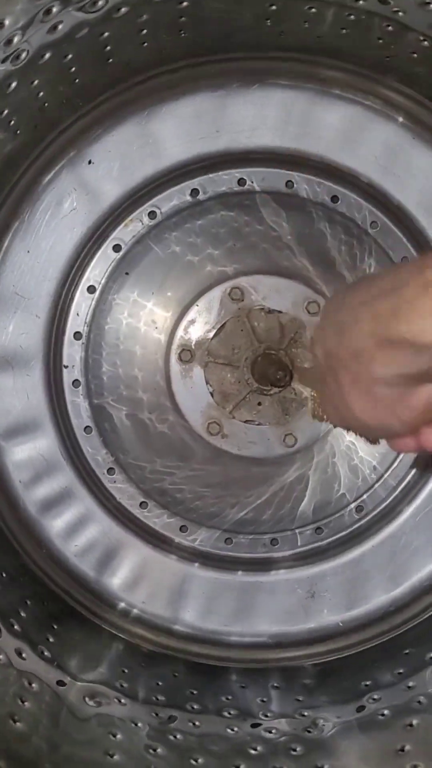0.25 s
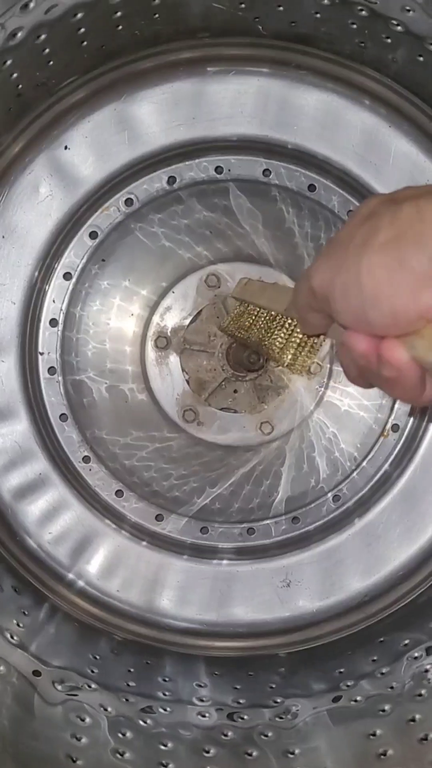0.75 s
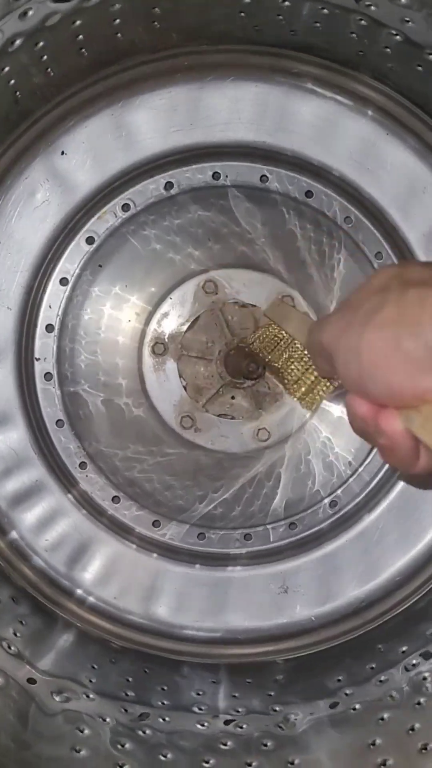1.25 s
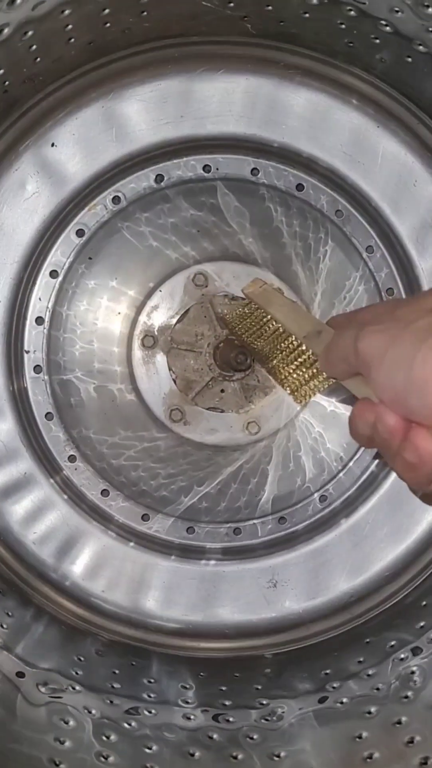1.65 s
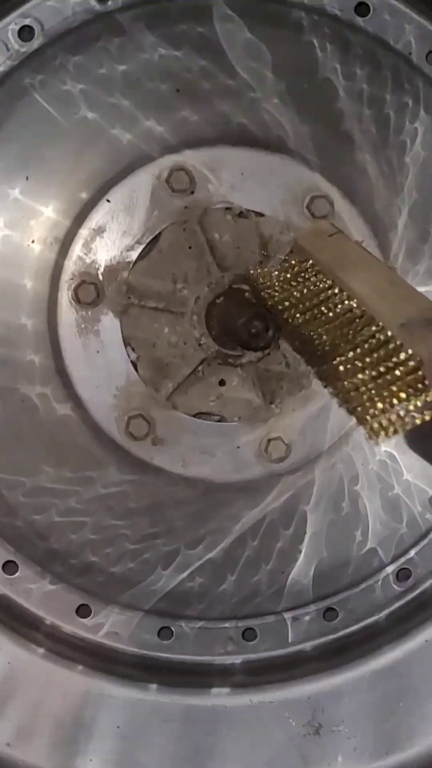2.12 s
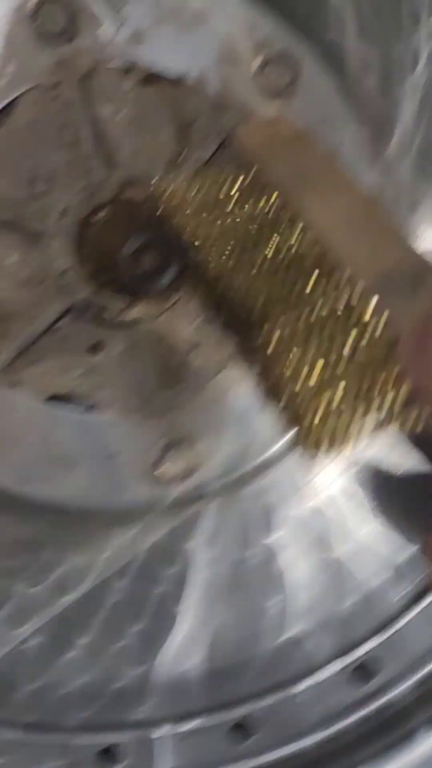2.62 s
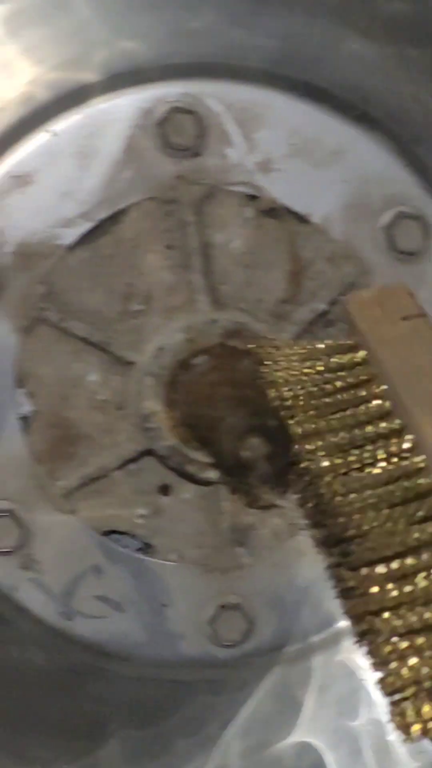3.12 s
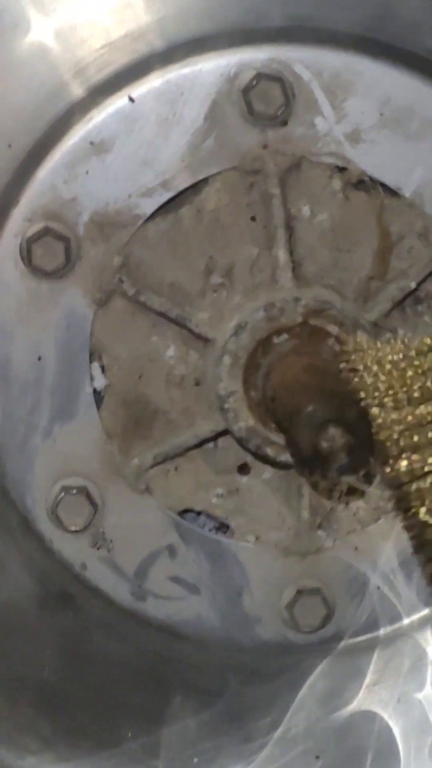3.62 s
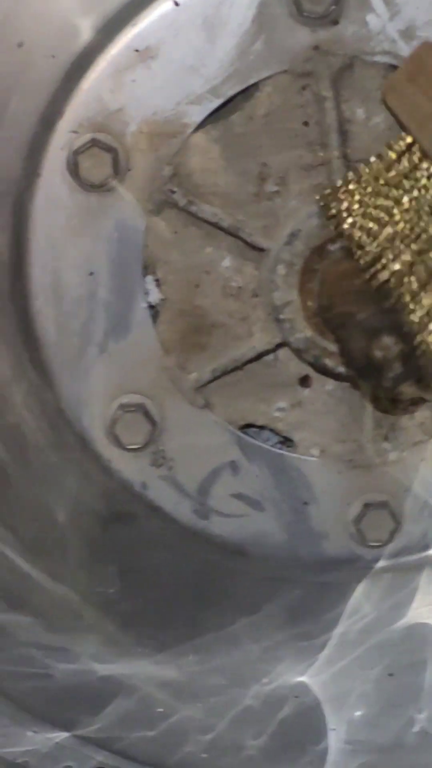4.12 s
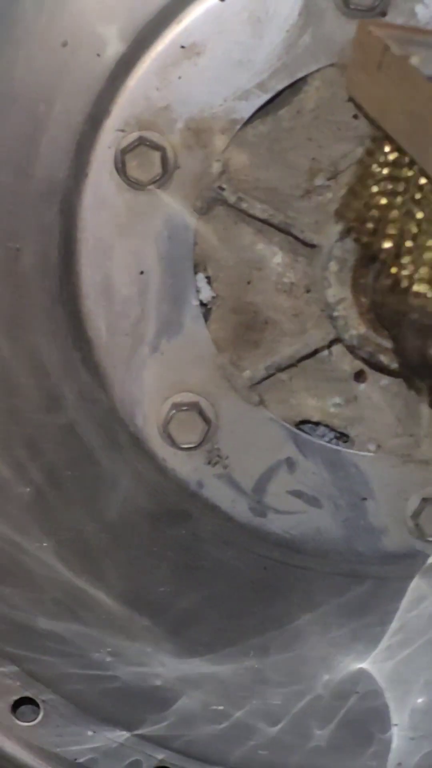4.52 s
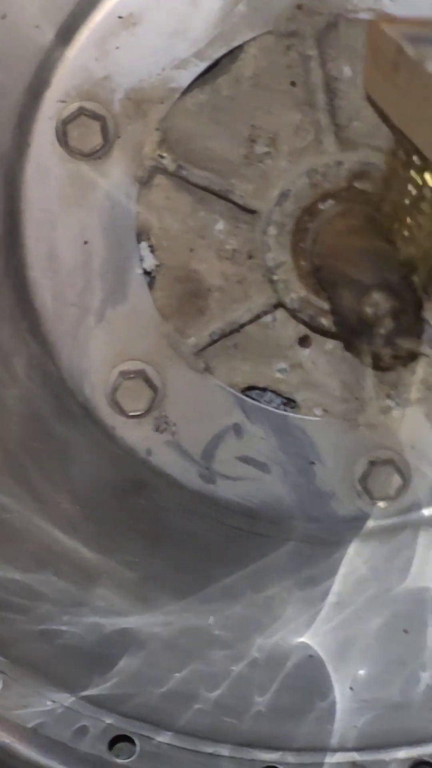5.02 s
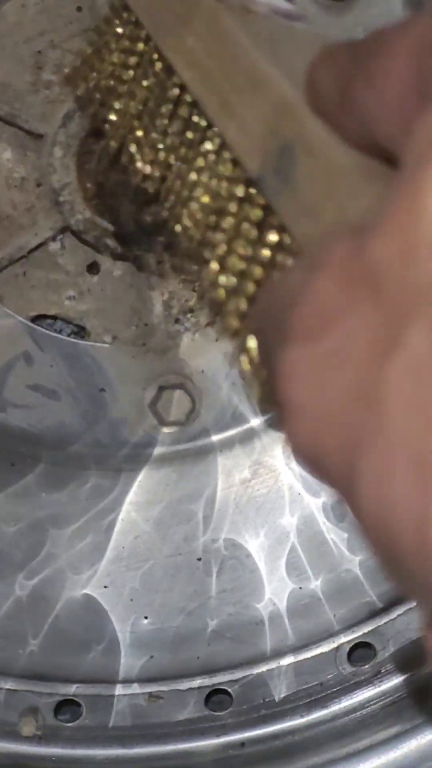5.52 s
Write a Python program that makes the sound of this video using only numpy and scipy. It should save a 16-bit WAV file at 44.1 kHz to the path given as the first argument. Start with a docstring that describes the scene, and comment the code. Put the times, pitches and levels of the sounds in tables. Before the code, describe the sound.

A wire brush knocks and scrapes inside a steel tub, then scrubs the grimy metal hub in quick, even, raspy strokes with hollow booming.

```python
"""Faint scraping and hard knocks open the scene, then a brass wire brush scrubs the grimy hub at the
bottom of a steel washing tub, about six strokes a second. Dense random bristle slips hiss, excite the hub's
resonances as a scrape and make the tub boom. Landings, shoves, knocks and clear pings are decaying noise
or modes. Echoes in the tub reach two microphone ports; a quiet room hums and a low rumble comes and goes."""
import sys
import numpy as np
from scipy import signal
from scipy.fft import rfft, irfft, next_fast_len
from scipy.io import wavfile
from scipy.ndimage import uniform_filter1d, map_coordinates

SR = 44100
rng = np.random.default_rng(int(sys.argv[2]) if len(sys.argv) > 2 else 0)


def wrap_up_sound(samples):
    """Save the sound to the file named by the first command line argument, as 16-bit audio."""
    columns = np.atleast_2d(samples).T
    # keep every value between -1 and 1, then stretch to whole-number steps
    tamed = np.clip(columns, -1, 1)
    steps = np.round(tamed * 32767).astype(np.int16)
    wavfile.write(sys.argv[1], SR, steps)


N = 253575

# Modes of the tub's air and wall. Each row: frequency in Hz, width in Hz, relative level in dB.
TUB_MODES = [(127.7, 31, -7.5), (274, 34, -1.5), (290.6, 24, 6.5), (328, 40.2, 7), (472.2, 28.3, 3.5),
             (594, 65, -15.5), (780, 74, -17)]
# Stereo width of the sound field. Each row: frequency in Hz, side minus mid in dB.
SIDE_SPECTRUM = [(80, -5.5), (180, -26), (350, -10.5), (700, -3), (2000, -3), (15000, 1)]
# The tub's upper modes ring more or less as the brush moves. Each row: time in seconds, gain in dB.
UPPER_GAIN = [(2.4, 2), (3.6, 3.5), (4.6, 0)]


def amp(db):
    """The decibel law: 20 dB is a factor of ten in amplitude."""
    return 10 ** (np.asarray(db) / 20)


def unit(x):
    """Normalise to an rms of one."""
    return x / np.sqrt(np.mean(x ** 2) + 1e-20)


def along(points, hz):
    """Interpolate (Hz, value) points on a log-frequency axis, since hearing judges pitch by ratio."""
    f, v = np.transpose(points)
    return np.interp(np.log(hz + 1), np.log(f + 1), v)


def curves(rows):
    """Interpolate linearly in time: one value per sample for each column after the time."""
    s, *columns = np.transpose(rows)
    return [np.interp(np.arange(N) / SR, s, column) for column in columns]


def wobble(rate):
    """Slow random modulation: a smooth curve through `rate` random knots a second."""
    knots = rng.standard_normal(int(N * rate / SR) + 4)
    return map_coordinates(knots, [np.arange(N) * rate / SR])


def filtered(x, response):
    """Linear filtering: the spectrum times a complex response of frequency."""
    m = next_fast_len(N + SR // 2)
    return irfft(rfft(x, m) * response(np.fft.rfftfreq(m, 1 / SR)), m)[..., :N]


def resonant(modes):
    """Modal superposition: damped resonators (Hz, width in Hz, dB) add with alternating sign."""
    def response(f):
        total = 0
        for k, (centre, width, db) in enumerate(modes):
            damping = 1j * f * width
            total = total + (-1) ** k * amp(db) * damping / (centre * centre - f * f + damping)
        return total
    return response


def coloured(x, spectrum):
    """Spectral shaping: a smooth (Hz, dB) curve weights the frequencies, rms one."""
    return unit(filtered(x, lambda hz: amp(along(spectrum, hz))))


def bursts(times, levels_db, t60s, rise):
    """Exponential decay: an envelope jumps at each time and falls 60 dB in each t60."""
    env, t = np.zeros(N + SR), np.arange(SR // 2) / SR
    for s, db, t60 in zip(times, levels_db, t60s):
        decay = amp(db - 60 * t / max(t60, .005))
        env[round(s * SR):][:len(t)] += decay * (1 - np.exp(-t / rise))
    return env[:N]


def strokes():
    """Speed sets friction loudness: each stroke is a bell in time, giving gains of hiss, scrape and boom."""
    # Brush strokes. Each row: fastest moment in seconds, speed-up in seconds, slow-down in seconds,
    # hiss level in dB, hub scrape in dB over hiss, tub boom in dB over hiss.
    stroke_rows = [(0.06, 0.45, 0.16, -39.5, 2, 9), (0.521, 0.092, 0.045, -49, 0.5, 5.5),
                   (0.762, 0.051, 0.034, -49.5, -2, 11), (0.884, 0.051, 0.065, -39.5, -6, -1),
                   (1.26, 0.02, 0.03, -41, -7, 9), (1.402, 0.1, 0.097, -50.5, 0, 8),
                   (1.579, 0.044, 0.038, -41, 1.5, 3), (1.72, 0.085, 0.069, -46, 6.5, 9),
                   (1.891, 0.052, 0.032, -36, 5, 12), (2.036, 0.074, 0.059, -30, 2, 8.5),
                   (2.211, 0.056, 0.028, -32, 4.5, 9.5), (2.332, 0.059, 0.08, -32.5, 3.5, 8),
                   (2.513, 0.06, 0.044, -31.5, 3.5, 8), (2.666, 0.075, 0.066, -34.5, 2.5, 8.5),
                   (2.831, 0.051, 0.042, -30, 2.5, 5.5), (2.989, 0.086, 0.063, -33, 4, 4),
                   (3.174, 0.067, 0.064, -34.5, 4, 7), (3.32, 0.067, 0.05, -32, 4, 6.5),
                   (3.483, 0.062, 0.062, -30, 2.5, 5.5), (3.64, 0.06, 0.051, -32.5, 3.5, 5.5),
                   (3.799, 0.057, 0.062, -30.5, 2.5, 3.5), (3.997, 0.079, 0.039, -33, 5, 6),
                   (4.134, 0.068, 0.063, -30, 3, 0), (4.305, 0.064, 0.055, -30.5, 3, 4.5),
                   (4.477, 0.056, 0.093, -29.5, 3.5, 2), (4.651, 0.049, 0.049, -31.5, 4, 6),
                   (4.805, 0.064, 0.043, -27.5, 1.5, 1), (4.975, 0.23, 0.051, -35, -0.5, 2.5),
                   (5.134, 0.08, 0.04, -35.5, -0.5, 5), (5.235, 0.041, 0.069, -37, -3.5, 5.5),
                   (5.479, 0.065, 0.056, -36, 3.5, 4), (5.629, 0.055, 0.078, -42, 4.5, 8.5),
                   (5.748, 0.019, 0.013, -40, 6.5, 14)]
    drop_db = 10  # hiss lost one speed-up before or one slow-down after the fastest moment
    scrape_follows, boom_follows = 0.89, 0.85  # shares of that fade
    s, rise, fall, db, scrape_db, boom_db = np.transpose(stroke_rows)[..., None]
    t = np.arange(0, N / SR + 1, 1 / 1000)
    side_s = np.where(t < s, rise, fall).clip(.005)
    fade_db = drop_db * ((t - s) / side_s) ** 2
    hissing = amp(db - fade_db).sum(axis=0)
    scraping = amp(db + scrape_db - scrape_follows * fade_db).sum(axis=0)
    booming = amp(db + boom_db - boom_follows * fade_db).sum(axis=0)
    return curves(np.transpose([t, hissing, scraping, booming]))


def room():
    """Broadband ambience, a wavering low rumble and noise-driven resonance of the tub's lowest mode."""
    # Steady background. Each row: frequency in Hz, relative spectral level in dB.
    room_spectrum = [(18, -47), (30, -9), (59, -4.5), (100, 6), (174, -9), (303, -6), (404, -20.5),
                     (632, -18), (1100, -28), (4780, -29.5), (16000, -56)]
    # Low rumble. Each row: time in seconds, level in dB about which it wavers.
    rumble_level = [(0.0, -70), (0.2, -32), (0.6, -52.5), (1.15, -70), (1.23, -55), (2.51, -61), (2.9, -40),
                    (3.17, -50), (3.81, -53.5), (5.25, -44.5), (5.41, -46), (5.75, -58)]
    room_db = -51
    mid, side = (coloured(rng.standard_normal(N), room_spectrum) for _ in range(2))
    side = amp(room_db) * filtered(side, lambda f: amp(along(SIDE_SPECTRUM, f)))
    rumble = coloured(rng.standard_normal(N), [(20, -26), (40, 3.0), (60, 13.0), (80, 9.0), (110, -49.5)])
    rumble *= amp(curves(rumble_level)[0] + 5.4 * wobble(18))
    sway = unit(filtered(rng.standard_normal(N), lambda f: resonant(TUB_MODES[:1])(f) ** 2))
    sway *= amp(-22) * strokes()[2] ** 0.77  # harder strokes rock the tub more
    mid = amp(room_db) * mid + rumble + sway
    return np.array([mid + side, mid - side])


def tub(x, hop=SR // 25):
    """Reverberation: sound bounces round the tub to two ports by paths that change every hop."""
    # Echo decay. Each row: frequency in Hz, t60 in seconds.
    echo_t60 = [(200, 0.099), (2000, 0.11), (12000, 0.053)]
    # Echo strength. Each row: frequency in Hz, gain of the echoes in dB.
    echo_share = [(200, -13), (1000, -7.5), (5000, -6), (13000, -4)]
    # Brush position. Each row: time in seconds, left minus right in dB.
    place = [(0.2, -1.2), (1.2, -1), (3.7, -2), (4.6, 0), (5.3, 0), (5.75, -0.5)]
    # Unequal colour of the ports. Each row: frequency in Hz, left minus right in dB.
    lean = [(500, 0), (1400, -1.5), (5000, 0.5), (9000, 3), (14000, 1.5)]
    paths, fade = np.zeros((2, N + SR)), np.hanning(2 * hop + 1)[:-1]
    padded = np.pad(x, (hop, 2 * hop))
    for at in range(0, N + hop, hop):
        # noise whose bands die away separately serves as the echo response
        hz, t, z = signal.stft(rng.standard_normal((2, SR // 6)), SR, nperseg=128)
        tail = signal.istft(z * amp(-60 * t / along(echo_t60, hz)[:, None]), SR, nperseg=128)[1]
        tail = tail / np.linalg.norm(tail, axis=1, keepdims=True)
        piece = padded[at:][:2 * hop] * fade  # overlapping pieces crossfade
        part = signal.fftconvolve(piece[None], tail, axes=1)
        paths[:, at:at + part.shape[1]] += part
    echo, across = paths[:, hop:hop + N]
    mid = 0.67 * x + filtered(echo, lambda f: amp(along(echo_share, f)))
    side = filtered(across, lambda f: amp(along(SIDE_SPECTRUM, f)))
    pan_db = curves(place)[0]
    pair = np.array([(mid + side) * amp(pan_db / 2), (mid - side) * amp(-pan_db / 2)])
    return filtered(pair, lambda f: amp(along(lean, f) / [[2], [-2]]))


def pings():
    """Free vibration: a catch of wire or wood on the hub rings one tone, roughened by phase drift."""
    # Clear rings. Each row: start in seconds, pitch in Hz, level in dB, t60 in seconds.
    ping_rows = [(.034, 2010, -26.5, 0.073), (.077, 1963, -29, .1), (.829, 1960, -44, 0.26),
                 (1.56, 3604, -27, 0.05), (1.688, 6450, -27.5, .06), (1.874, 3050, -24, 0.15),
                 (4.062, 2034, -25.5, 0.14), (5.371, 1182, -24, 0.15), (5.371, 1360, -22.5, 0.087)]
    out, t = np.zeros(N + SR), np.arange(SR // 2) / SR
    for s, hz, db, t60 in ping_rows:
        drift = np.cumsum(rng.normal(0, 0.064, len(t)))
        tone = np.sin(2 * np.pi * hz * t + drift) * (1 - np.exp(-t / 0.00053))
        out[round(s * SR):][:len(t)] += amp(db - 60 * t / max(t60, .01)) * tone
    return out[:N]


def knocks():
    """Impact excitation: a blow cracks in the wood, thuds in and rocks the tub, and rings the steel wall."""
    # Knocks of the brush back and shoves on the tub. Each row: time in seconds, relative levels of wood
    # crack in dB and thud in dB, thud brightness in dB per octave, relative levels of deep rocking in dB
    # and steel clang in dB, base t60 in seconds (scaled for crack and clatter).
    knock_rows = [(0.137, -22, -10.5, -4, -23.5, -21, 0.17), (0.158, -3.5, -13.5, 12, -12, -3, 0.078),
                  (.169, -12, -4, 16, -18, -39, 0.091), (0.204, -17, -7, 2, -33, -20, 0.2),
                  (.334, -38, -17, -21.5, -31, -33.5, 0.21), (.677, -37.5, -15, -15.5, -25, -23, 0.092),
                  (1.226, -40, -25, 14.5, -30.5, -29, 0.14), (1.724, -36, -48, -2, -70, -31.5, .07),
                  (5.157, -3.5, -23, 6, -48, -18, 0.04), (5.162, -25, -5.5, -32.5, -25.5, -46, 0.081),
                  (5.372, -42, -23.5, -5, -27, -32, 0.22)]
    # Modes of the steel wall. Each row: frequency in Hz, relative level in dB, t60 in seconds.
    sheet = [(1773, -20, 0.73), (2030, -31, 1.56), (2318, -8.5, 0.28), (2477, -11, 0.31), (3390, -12, 0.35),
             (2060, -8, 0.18)]
    rock_s = 0.022  # the rocking peaks this long after a blow
    soft_db = 13  # each such step of the crack under the thud doubles the thud's rise time
    tub_middle_hz = 330  # brightness tilts the modes about this pitch
    s, db, thud_db, bright_db, rock_db, clang_db, t60 = np.transpose(knock_rows)
    low, wall, t = np.zeros(N + SR), np.zeros(N + SR), np.arange(SR) / SR
    rise = 1 - np.exp(-t / 0.0011)
    rock_hz = TUB_MODES[0][0]
    rock = np.sin(2 * np.pi * rock_hz * t) * t / rock_s * np.exp(1 - t / rock_s)
    for k in range(len(s)):
        at = round(s[k] * SR)
        swell = 1 - np.exp(-t / (0.0016 * 2 ** ((thud_db[k] - db[k]) / soft_db)))
        thud = np.zeros(SR)
        for hz, width, level in TUB_MODES[1:]:
            tilt = (hz / tub_middle_hz) ** (bright_db[k] / (20 * np.log10(2)))
            gain = amp(level + rng.normal(0, 0.93)) * tilt
            thud += gain * np.sin(2 * np.pi * hz * t) * np.exp(-t * width * 1.13)
        thud_gain = amp(thud_db[k] - 9.5 - 60 * t / max(t60[k], .01))
        low[at:][:SR] += thud_gain * thud * swell + amp(rock_db[k]) * rock
        for hz, level, life in sheet:
            drift = np.cumsum(rng.normal(0, 0.016, SR))  # crowded neighbour modes smear each ring
            ring = np.sin(2 * np.pi * hz * t + drift) * rise
            wall[at:][:SR] += amp(clang_db[k] + level - 11.5 - 60 * t / life) * ring
    crack = coloured(rng.standard_normal(N), [(200, -18), (480, 8), (900, -3.0), (1300, -11),
                                              (2500, -21.0), (4000, -61)])
    crack *= bursts(s, db - 1.5, t60 * 0.62, 0.000097)
    clatter = coloured(rng.standard_normal(N), [(900, -26), (1500, -17.5), (2100, -0.5), (2700, -16.0),
                                                (3400, -9.5), (6000, -33), (12000, -88.5)])
    clatter *= bursts(s, clang_db - 11.5, t60 * 1.65, 0.0004)
    return low[:N] + amp(1.3 * wobble(40)) * wall[:N] + crack + clatter


def thumps():
    """Modal excitation: each shove swells and dies in the tub's three strongest modes, mixed anew."""
    # Bristle rows shove against the ribs of the hub. Each row: start in seconds, relative level in dB.
    thump_rows = [(1.358, -27), (1.414, -27), (1.546, -24), (1.595, -27.5), (1.667, -23), (1.725, -23.5),
                  (1.824, -22), (2.019, -18.5), (2.3, -15), (2.466, -15), (2.62, -17), (2.805, -15),
                  (2.847, -16.5), (2.957, -17.5), (3.271, -23), (3.611, -16), (3.797, -19.5), (4.447, -16),
                  (4.629, -18), (4.671, -19), (4.979, -22)]
    swell_s, modes_db, scatter_db = 0.0082, -12, 1.5  # time to the peak; gain and scatter of the modes
    parts, t = np.zeros((3, N + SR)), np.arange(SR // 8) / SR
    hz, _, level = np.transpose(TUB_MODES[2:5])[..., None]
    swell = t / swell_s * np.exp(1 - t / swell_s)
    for (s, db), chance in zip(thump_rows, rng.standard_normal((len(thump_rows), 2, 3, 1))):
        gain = amp(db + modes_db + level + scatter_db * chance[0])
        tones = np.sin(2 * np.pi * hz * t + chance[1])
        parts[:, round(s * SR):][:, :len(t)] += gain * swell * tones
    return parts[0, :N] + parts[1, :N] + amp(curves(UPPER_GAIN)[0]) * parts[2, :N]


def slips(spread_db, clump_db, clump_rate):
    """Stick-slip friction: bristle tips slip in dense ticks of uneven size that come in clumps."""
    size_db = spread_db * rng.exponential(size=N).clip(0, 4.5)
    return unit(rng.standard_normal(N) * amp(size_db + clump_db * wobble(clump_rate)))


def patchy(x, depth_db):
    """Time-frequency modulation: tufts of wire sing in turn, so patches of pitch and time stand out."""
    z = signal.stft(x, nperseg=256)[2]
    field = uniform_filter1d(rng.standard_normal(z.shape), size=5, axis=0)
    field = uniform_filter1d(field, size=9, axis=1)
    return unit(signal.istft(z * amp(depth_db * unit(field)), nperseg=256)[1][:N])


def boom(push):
    """Forced vibration: the tub's low resonances answer a push, the upper ones by a moving gain."""
    lower = filtered(push, resonant(TUB_MODES[2:4]))
    upper = filtered(push, resonant(TUB_MODES[4:]))
    return lower + amp(curves(UPPER_GAIN)[0]) * upper


def brush():
    """Friction excitation: bristle slips hiss by themselves, scrape the hub and drive the tub."""
    # Bristles landing or catching. Each row: time in seconds, hiss level in dB, scrape level in dB,
    # t60 in seconds.
    landings = [(.034, -35, -53, 0.081), (.077, -35, -41, 0.1), (.119, -33, -36, 0.072),
                (0.137, -16, -16.5, 0.067), (0.675, -27.5, -25.5, 0.067), (0.758, -40, -57, 0.085),
                (.829, -43.5, -47, 0.049), (0.919, -21.5, -65, 0.05), (1.224, -31.5, -25, 0.066),
                (1.323, -42, -62, 0.033), (1.366, -43, -57, 0.032), (1.484, -41.5, -44, 0.046),
                (1.534, -52, -44, 0.036), (1.649, -24.5, -53, 0.042), (1.719, -29, -49, 0.037),
                (4.063, -42, -37, 0.041), (4.433, -30, -24, 0.048), (4.628, -37, -37, 0.13),
                (4.977, -23.5, -32.5, 0.064), (5.125, -32, -30, 0.11), (5.21, -25, -35, 0.039),
                (5.371, -27, -19.5, 0.055), (5.586, -45, -36, 0.062)]
    # Modes of hub and shaft. Each row: frequency in Hz, width in Hz, relative level in dB.
    hub = [(1024, 75, 3), (1160, 130, 7.5), (1348, 29, 8), (2010, 87, 6), (2275, 61, -2), (3100, 180, 2),
           (3966, 53, 5), (4547, 254, 2.5)]
    # Spectra of hiss and scrape. Each row: frequency in Hz, relative spectral level in dB.
    hiss_spectrum = [(2940, -15), (5000, -6.5), (7270, -3), (9650, -9.5), (11700, -6.5), (14700, -1.5),
                     (16000, -10)]
    scrape_spectrum = [(380, -30), (650, -4.5), (1110, -10), (1630, -6.5), (2020, -6), (2500, -1.5),
                       (6000, -6), (7800, -11.5), (13200, -120)]
    hissing, scraping, booming = strokes()
    s, hiss_db, hub_db, t60 = np.transpose(landings)
    rows = amp(1.04 * wobble(18))  # rows of bristles cross the ribs of the hub
    hiss = coloured(slips(spread_db=2.5, clump_db=1.5, clump_rate=220), hiss_spectrum)
    hiss = patchy(hiss, depth_db=3.5)
    hiss *= hissing * rows + bursts(s, hiss_db, t60, 0.00015)
    ticks = slips(spread_db=2.5, clump_db=1.96, clump_rate=70)
    # each hub mode rings more or less as the brush moves over its nodes
    rings = sum(amp(1.84 * wobble(8)) * filtered(ticks, resonant([mode])) for mode in hub)
    scrape = patchy(coloured(ticks, scrape_spectrum) + amp(-2.5) * unit(rings), depth_db=1.5)
    scrape *= scraping * rows + bursts(s, hub_db, t60, 0.00072)
    push = slips(spread_db=1.5, clump_db=3.0, clump_rate=30)
    return hiss + scrape + amp(-1.5) * booming * unit(boom(push))


def scene():
    """Superposition: sources inside the tub share its echoes, and the room adds to them."""
    return tub(brush() + thumps() + knocks() + pings()) + room()


def record(dry):
    """Transducer limits: a bass roll-off, soft saturation of the loudest peaks and a steep upper band limit."""
    top_hz = 15850
    sound = filtered(dry, lambda hz: (1j * hz / (35 + 1j * hz)) ** 2)
    sound = sound / (1 + np.abs(sound / .97) ** 4) ** (1 / 4)
    return filtered(sound, lambda hz: 1 / (1 + (hz / top_hz) ** 300))


dry = scene()
out = record(dry)
wrap_up_sound(out)
```